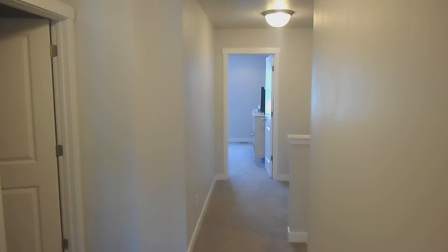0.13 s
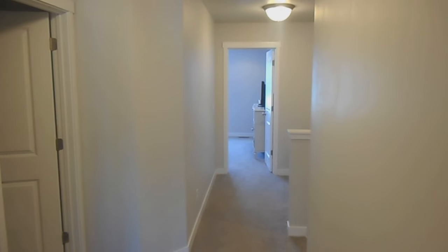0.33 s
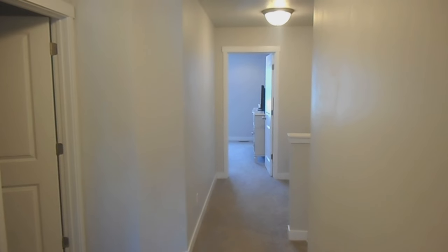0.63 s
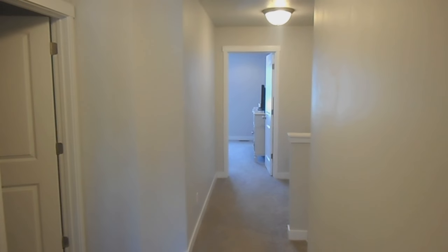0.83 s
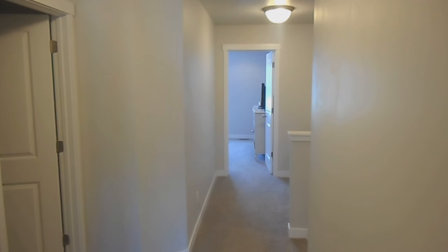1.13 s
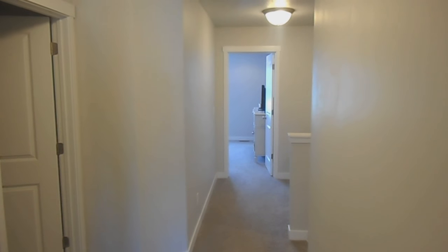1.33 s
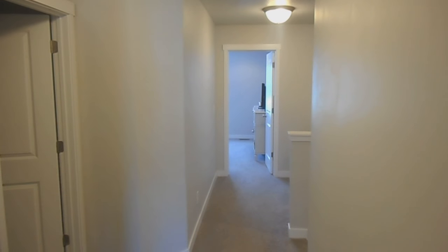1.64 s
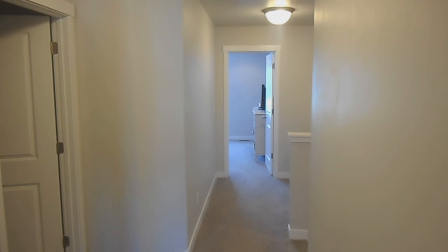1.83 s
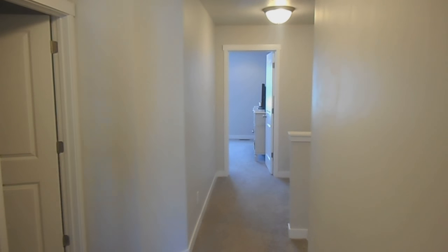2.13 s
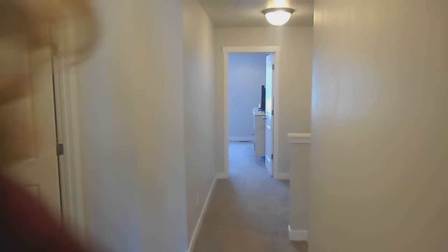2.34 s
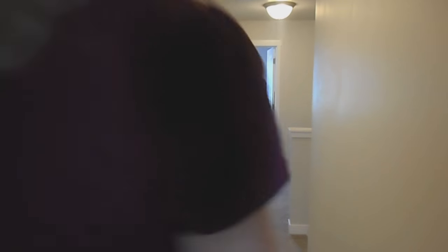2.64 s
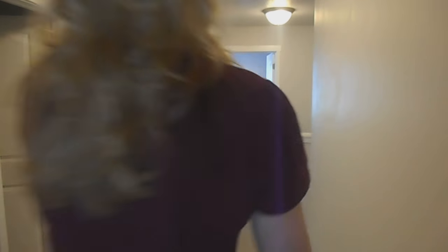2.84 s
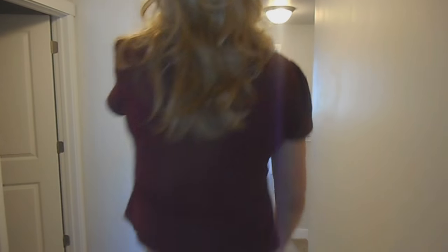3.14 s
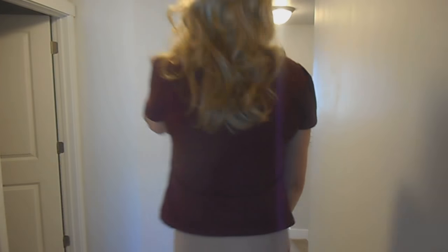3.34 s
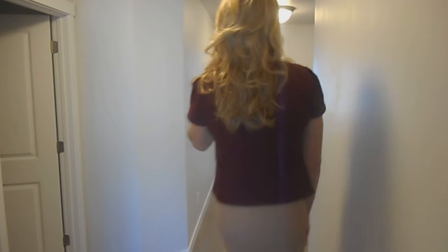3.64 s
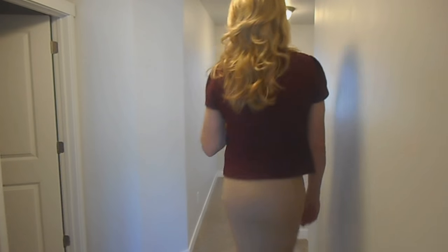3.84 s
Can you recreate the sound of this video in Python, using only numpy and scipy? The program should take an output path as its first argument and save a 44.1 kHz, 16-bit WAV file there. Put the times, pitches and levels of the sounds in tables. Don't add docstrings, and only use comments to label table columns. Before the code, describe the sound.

Muffled footsteps and clothing rustle in a carpeted indoor hallway, over steady microphone hiss. A faint low motor hum rises slightly and stops around 0.8 s. Light scuffs come at the start, then a step at 0.85 s, denser cloth swishes from 1.25 to 1.6 s, dull floor thuds around 2 and 2.7 s, ticks near 2.9 and 3.7 s, and a loud sharp snap at 3.87 s, its short ringing tail cut by the end.

```python
import sys
import numpy as np
from scipy import signal
from scipy.fft import rfft, irfft
from scipy.io import wavfile
from scipy.ndimage import uniform_filter1d

SR = 44100
rng = np.random.default_rng(int(sys.argv[2]) if len(sys.argv) > 2 else 0)


def magnitude_from_level(level_db):
    exponent = np.asarray(level_db, float) / 20
    return 10 ** exponent


def wav_record(signal):
    frames = np.transpose(np.atleast_2d(signal))
    bounded = np.clip(frames, -1, 1)
    quanta = np.round(bounded * 32767).astype(np.int16)
    wavfile.write(sys.argv[1], SR, quanta)


N = 176400


def evened(x):
    return x / np.sqrt(np.mean(x ** 2) + 1e-20)


def read_curve(points, hz):
    f, value = np.transpose(points)
    return np.interp(np.log(hz + 1), np.log(f + 1), value)


def colour(x, points):
    hz = np.fft.rfftfreq(len(x), 1 / SR)
    return evened(irfft(rfft(x) * magnitude_from_level(read_curve(points, hz)), len(x)))


def add(mix, start_s, sound):
    part = mix[round(start_s * SR):][:len(sound)]
    part += sound[:len(part)]


def resonate(x, hz, width):
    turn = np.exp(2j * np.pi * hz * np.arange(len(x)) / SR)
    r = np.exp(-np.pi * width / SR)
    return 2 * (turn * signal.lfilter([1 - r], [1, -r], x / turn)).real


def resonate_twice(x, hz, width):
    return resonate(resonate(x, hz, width), hz, width)


def wander(count, size):
    return evened(uniform_filter1d(uniform_filter1d(rng.standard_normal(count), size=size), size=size))


# frequency in Hz, level per Hz in dB.
HISS = [(15, -49), (25, -14.5), (665, -4), (1020, -2), (1870, -5), (2470, -4), (6280, -8), (8720, -14),
        (10400, -22.5), (13500, -58), (22000, -120)]


def background():
    hiss_db, hum_db = -60.5, -77
    hum_hz, rise_hz, width_hz, end_s = 114.3, 9.0, 3.7, 0.76
    t = np.arange(N) / SR
    pitch_hz = hum_hz + rise_hz * np.minimum(t / end_s - 0.5, 0.5)
    hum = np.sin(2 * np.pi * np.cumsum(pitch_hz) / SR)
    hum = hum + 0.15 * evened(resonate(rng.standard_normal(N), hum_hz, width_hz))
    hum = hum * magnitude_from_level(hum_db) * np.clip((end_s - t) / 0.1, 0.25, 1)
    return magnitude_from_level(hiss_db) * colour(rng.standard_normal(N), HISS) + hum


def patchy(x):
    patch_db = 1.4
    z = signal.stft(x, nperseg=256)[2]
    patches = uniform_filter1d(rng.standard_normal(z.shape), size=4, axis=0)
    patches = evened(uniform_filter1d(patches, size=8, axis=1))
    return evened(signal.istft(z * magnitude_from_level(patch_db * patches), nperseg=256)[1][:N])


def fibres(points):
    fibres_per_s, spread_db, flutter_db = 9000, 2.0, 1.2
    size = magnitude_from_level(spread_db * np.minimum(rng.exponential(1, N), 4))
    slipping = rng.random(N) < fibres_per_s / SR
    slips = evened(rng.standard_normal(N) * size * slipping)
    slips = slips + 0.82 * rng.standard_normal(N)
    return patchy(colour(slips, points)) * magnitude_from_level(flutter_db * wander(N, 500))


# peak in seconds, rise in seconds, fall in seconds, level in dB,
# share of cloth from 0 to 1.
STROKES = [(.095, 0.018, 0.043, -58.5, 0.24), (.25, 0.086, 0.085, -63, 0.01),
           (.865, 0.033, 0.033, -56, 0.34), (1.1, 0.14, 0.09, -69, 0.06), (1.25, 0.028, 0.03, -55.5, 0.24),
           (1.34, 0.043, 0.059, -55.5, 0.66), (1.43, 0.033, 0.041, -56.5, 0.3),
           (1.466, 0.039, 0.028, -52.5, 0.82), (1.578, 0.043, 0.049, -51.5, 0.95),
           (1.85, 0.12, .06, -63.5, 0.6), (2.01, 0.06, 0.057, -60, 0.34), (2.09, 0.019, 0.065, -58, 0.18),
           (2.175, 0.039, 0.037, -52.5, 0.5), (2.3, 0.068, 0.054, -53, 0.48),
           (2.49, 0.07, 0.053, -55.5, 0.9), (2.66, 0.15, 0.13, -58.5, 0.75), (2.88, 0.065, 0.037, -52, 0.4),
           (3.0, 0.057, 0.054, -55.5, 0.71), (3.17, 0.08, 0.16, -59, 0.85),
           (3.464, 0.019, 0.044, -52.5, 0.35), (3.555, 0.031, 0.029, -53.5, 0.47),
           (3.61, 0.015, 0.027, -53, 0.56), (3.687, 0.02, 0.021, -46, 0.6), (3.73, .03, 0.063, -63, 0.3)]
# frequency in Hz, level per Hz in dB.
SCUFF = [(88, -51), (150, -12), (1020, 0.5), (1790, -5.5), (2210, -5.5), (4540, -14.5), (8390, -31),
         (10000, -30), (13000, -59), (22000, -120)]
# frequency in Hz, level per Hz in dB.
CLOTH = [(350, -39), (600, -15.5), (1450, -10), (2310, -2), (2700, -3.5), (3640, -1.5), (6610, -7.5),
         (9000, -14), (10400, -20.5), (13500, -52), (22000, -120)]


def strokes():
    t = np.arange(N) / SR
    sole_power, cloth_power = np.zeros(N), np.zeros(N)
    for peak, rise, fall, db, cloth_share in STROKES:
        power = magnitude_from_level(2 * db) * np.exp(-((t - peak) / np.where(t < peak, rise, fall)) ** 2)
        sole_power += (1 - cloth_share) * power
        cloth_power += cloth_share * power
    return np.sqrt(sole_power) * fibres(SCUFF) + np.sqrt(cloth_power) * fibres(CLOTH)


# start in seconds, peak
# level in dB, centre in Hz, width in Hz.
CLICKS = [(0.0835, -40.5, 3200, 2200), (.0847, -45, 2200, 1200), (.1137, -45, 3100, 1500),
          (.1140, -50, 7500, 4000), (.8385, -52, 800, 700), (.8675, -51, 2600, 400),
          (.8800, -50.5, 1035, 400), (1.2800, -42, 2100, 1200), (1.2826, -41, 950, 500),
          (1.2855, -38, 1100, 1300), (1.307, -43.5, 7000, 2500), (2.8684, -30.5, 3600, 2600),
          (2.8736, -39, 4400, 2000), (2.8780, -45, 1100, 600), (2.8845, -38, 1310, 900),
          (2.8847, -45, 5100, 1500), (2.9033, -38, 2600, 2500), (2.9152, -41, 1600, 1500),
          (2.975, -35, 3600, 2600), (2.9775, -36, 4500, 2400), (3.675, -33, 3000, 2000),
          (3.6796, -40, 5000, 2500), (3.6873, -37, 1450, 500), (3.6916, -33, 3600, 1500),
          (1.5570, -46, 3580, 700), (1.5660, -47, 3700, 600), (1.577, -46, 3800, 600),
          (1.5720, -47, 2350, 300), (3.8660, -21.5, 4700, 1090), (3.868, -26, 4360, 900),
          (3.8850, -31, 4320, 1200), (3.886, -26, 2930, 704), (3.911, -29, 5030, 900),
          (3.6800, -40.5, 1310, 200), (3.6880, -39, 2190, 200)]


def clicks():
    out = np.zeros(N)
    pulse = -1.0 * (np.arange(1500) == 0)
    for start_s, db, hz, width in CLICKS:
        ring = resonate_twice(pulse, hz, width)
        add(out, start_s, magnitude_from_level(db) * ring / abs(ring).max())
    return out


# start in seconds, level in dB, centre in Hz, width in Hz,
# time to fall 60 dB in seconds.
TICKS = [(.0835, -43, 2500, 2000, 0.04), (.1145, -47, 3000, 2000, 0.03), (1.279, -35.5, 730, 1200, 0.21),
         (1.279, -42.5, 2270, 1500, 0.076), (1.554, -44, 2340, 300, 0.2), (1.54, -46, 1699, 300, 0.14),
         (2.172, -43, 1000, 1010, 0.044), (2.73, -48, 2200, 2000, .03), (2.869, -42, 3400, 2100, 0.017),
         (2.873, -42.5, 1210, 640, 0.13), (2.877, -46, 5200, 1500, 0.03), (2.897, -45, 1600, 1500, 0.03),
         (2.973, -42, 1500, 1200, .04), (2.978, -46, 3470, 2100, .02), (3.866, -23, 4680, 1500, 0.032),
         (3.4547, -46, 2500, 3000, .04), (3.6038, -36, 3100, 3800, 0.02), (3.67, -38, 1410, 500, 0.17),
         (3.69, -38, 3400, 900, 0.094), (3.704, -40.5, 985, 400, 0.16), (3.993, -40.5, 1400, 3000, .05),
         (2.73, -52, 454, 300, 0.18), (.848, -49, 2350, 600, 0.33), (1.415, -48, 945, 500, 0.33)]


def ticks():
    click_gain, length = 3.6, 6000
    out, t = np.zeros(N), np.arange(length) / SR
    pulse = 1.0 * (np.arange(length) == 12)
    for start_s, db, hz, width, t60 in TICKS:
        crackle = evened(resonate_twice(rng.standard_normal(length), hz, width))
        crackle = crackle * np.minimum(t / np.maximum(0.0006, 2 / width), 1) * magnitude_from_level(-60 * t / t60)
        click = resonate_twice(pulse, hz, width)
        click = click_gain * (width > 2200) * click / abs(click).max()
        add(out, start_s, magnitude_from_level(db - 8) * (crackle + click))
    return signal.sosfilt(signal.butter(3, [200, 7800], "band", fs=SR, output="sos"), out)


# start in seconds, level in dB, board pitch in Hz, time to fall 60 dB in seconds.
THUDS = [(.835, -61, 290, .2), (.831, -55, 150, 0.18), (.845, -58.5, 212, 0.29), (1.028, -59, 475, 0.18),
         (1.105, -59, 474, 0.21), (1.281, -49.5, 239, 0.14), (1.925, -62, 200, 0.14),
         (1.966, -48, 214, 0.1), (1.998, -48, 236, .14), (2.04, -53.5, 202, 0.16), (2.074, -60, 193, 0.4),
         (2.068, -50, 602, 0.13), (2.245, -55, 195, 0.2), (2.678, -59.5, 208, 0.27),
         (2.727, -48.5, 201, 0.15), (2.781, -60, 171, 0.19), (2.835, -59, 159, .2), (2.88, -59, 130, 0.25),
         (3.399, -66, 161, 0.18), (3.455, -63, 161, 0.17), (3.56, -63, 170, 0.18), (3.672, -50, 469, 0.37),
         (3.864, -43.5, 237.4, 0.25), (3.908, -44.5, 225, .15), (3.945, -53.5, 192, .3),
         (3.52, -67, 44.7, 0.67), (3.865, -60, 60.3, 0.15), (2.87, -68, 60, .3), (.085, -75, 50, .2)]


def thuds():
    rise_s, blur_gain, length = 0.004, 0.35, 9000
    out, t = np.zeros(N), np.arange(length) / SR
    for start_s, db, hz, t60 in THUDS:
        board = np.sin(2 * np.pi * hz * t) * magnitude_from_level(-25 * t / t60)
        overtone = 0.56 * np.sin(2 * np.pi * 2.1 * hz * t) * magnitude_from_level(-90 * t / t60)
        blur = blur_gain * evened(resonate_twice(rng.standard_normal(length), hz, hz * 0.82))
        shape = (1 - np.exp(-t / rise_s)) * magnitude_from_level(db - 0.5 - 60 * t / t60)
        add(out, start_s, (board + overtone + blur) * shape)
    return out


# frequency in Hz, level per Hz in dB.
SNAP = [(350, -46), (600, -21), (838, -11), (1490, -27), (1960, -12.5), (3510, -5.5), (4350, 0),
        (8490, -20.5), (10400, -30), (13500, -64), (22000, -120)]
# frequency in Hz, level per Hz in dB.
SNAP_TAIL = [(350, -49), (600, -22), (900, -1.5), (1840, -9), (1930, -7), (4560, -5), (8190, -11.5),
             (10400, -26), (13500, -59), (22000, -120)]
# centre in Hz, width in Hz, level in dB.
SNAP_RING = [(1238, 19, -6.5), (1975, 38, -6.5), (2930, 67, 0.5), (3950, 36, -2), (4200, 26, -7),
             (4570, 37, -1), (4920, 22, 0.5)]


def snap():
    snap_s, lead_s, hold_s, length = 3.8657, 0.003, 0.011, 8000
    snap_db, lead_db, tail_db, ring_db, rattle_db = -28.5, -9, -7, -4, 1.5
    crack_t60, tail_t60 = 0.055, 0.24
    out, t = np.zeros(N), np.arange(length) / SR
    rings = np.zeros(length)
    for hz, width, db in SNAP_RING:
        rings += magnitude_from_level(db) * evened(resonate(rng.standard_normal(length), hz, width))
    rings = evened(rings)
    crack = colour(rng.standard_normal(length), SNAP) + magnitude_from_level(ring_db) * rings
    tail = colour(rng.standard_normal(length), SNAP_TAIL) + magnitude_from_level(ring_db - 9) * rings

    after = np.maximum(t - lead_s - hold_s, 0)
    lead_in = magnitude_from_level(lead_db) * np.minimum(t / 0.00082, 1)
    crack = crack * np.where(t < lead_s, lead_in, magnitude_from_level(-60 * after / crack_t60))
    tail = tail * magnitude_from_level(rattle_db * wander(length, 60))
    tail = tail * np.clip((t - lead_s) / hold_s, 0, 1) * magnitude_from_level(tail_db - 60 * after / tail_t60)
    add(out, snap_s - lead_s, magnitude_from_level(snap_db) * (crack + tail))
    return out


# frequency in Hz, time to fall 60 dB in seconds.
HALL_T60 = [(200, 0.39), (1000, 0.47), (4000, 0.45), (9000, 0.4)]


def hall(x):
    taps = np.zeros(20000)
    at = np.arange(200, 19980, 20)
    taps[at + rng.integers(0, 20, len(at))] = rng.choice([-1.0, 1.0], len(at))
    hz, t, z = signal.stft(taps, SR, nperseg=256)
    fading = z * magnitude_from_level(-60 * t / read_curve(HALL_T60, hz)[:, None])
    tail = signal.istft(fading, SR, nperseg=256)[1]
    return signal.fftconvolve(x, tail / np.linalg.norm(tail))[:N]


def scene():
    hall_db = -7.5
    near = strokes() + clicks() + ticks() + thuds() + snap()
    return np.tile(background() + near + magnitude_from_level(hall_db) * hall(near), (2, 1))


def top_cut(x):
    return signal.sosfilt(signal.butter(12, 12320, fs=SR, output="sos"), x)


def record(dry):
    start_s, edge_hz, shift_hz, image_db = 0.0358, 10450, 5500, -38
    t = np.arange(N) / SR
    low_pass = signal.firwin(141, edge_hz, window=("kaiser", 7), fs=SR)
    kept = signal.oaconvolve(dry, low_pass[None], "same")
    shifted = kept * 2 * np.cos(2 * np.pi * shift_hz * t)
    image_band = signal.firwin(301, [11200, 12300], pass_zero=False, window=("kaiser", 8), fs=SR)
    image = signal.oaconvolve(shifted, image_band[None], "same")
    started = np.arange(N) >= start_s * SR
    return top_cut((kept + magnitude_from_level(image_db) * image) * started)


dry = scene()
out = record(dry)
wav_record(out)
```